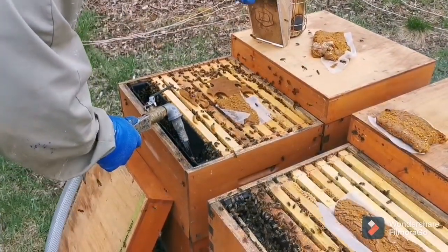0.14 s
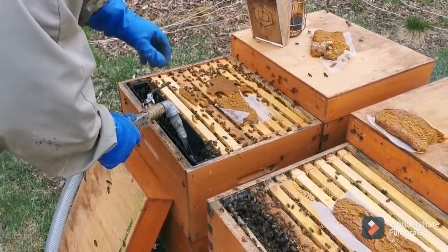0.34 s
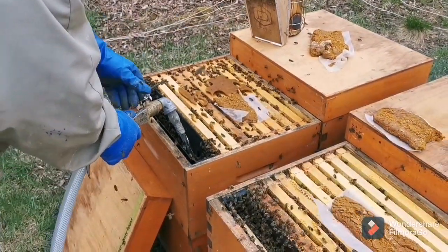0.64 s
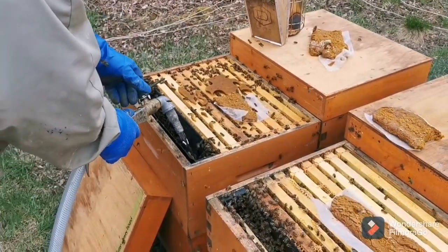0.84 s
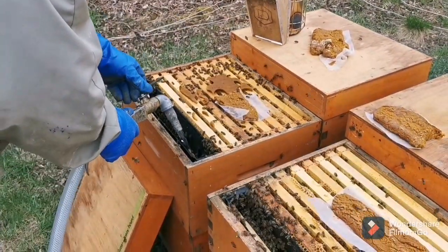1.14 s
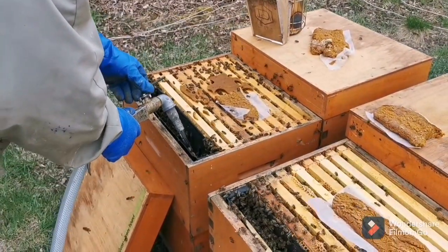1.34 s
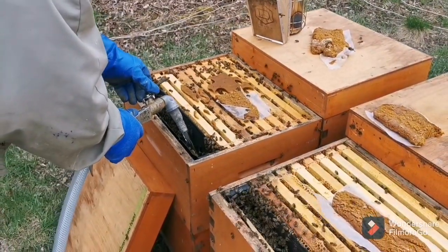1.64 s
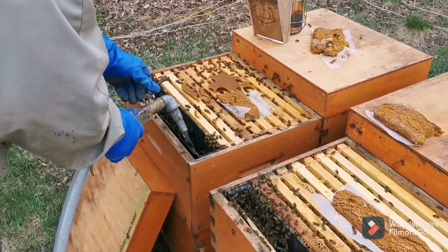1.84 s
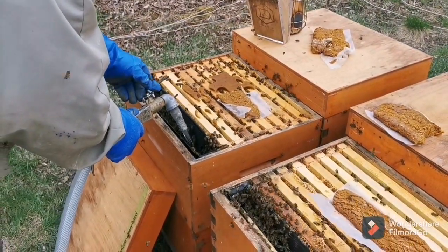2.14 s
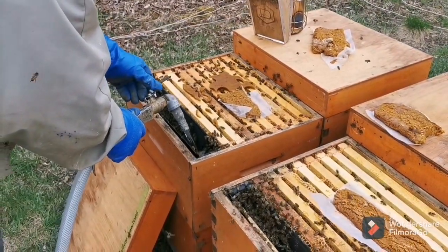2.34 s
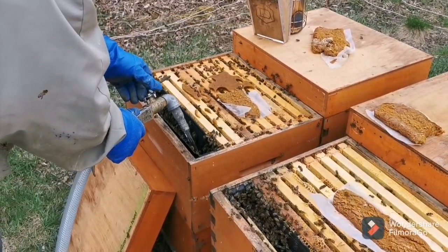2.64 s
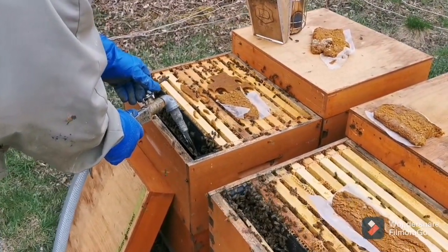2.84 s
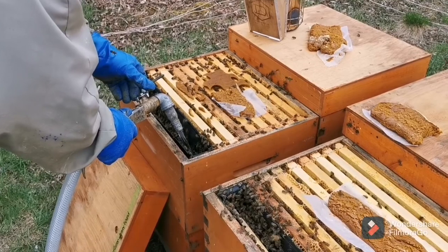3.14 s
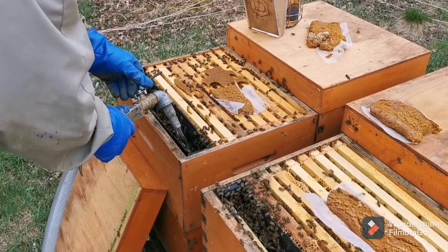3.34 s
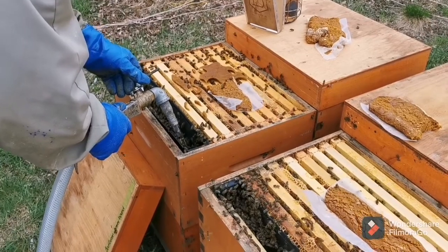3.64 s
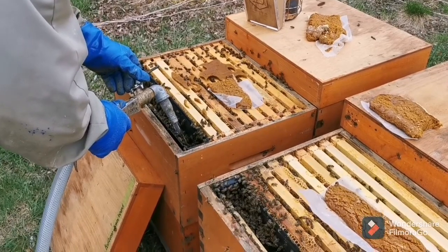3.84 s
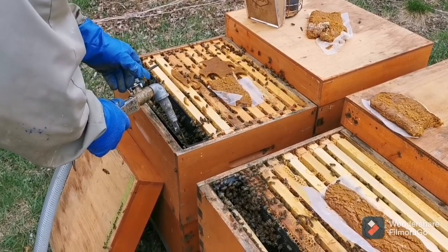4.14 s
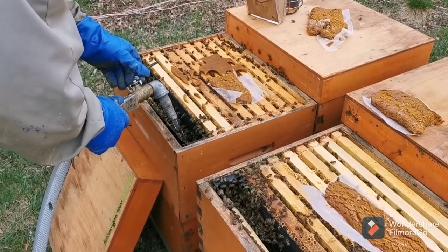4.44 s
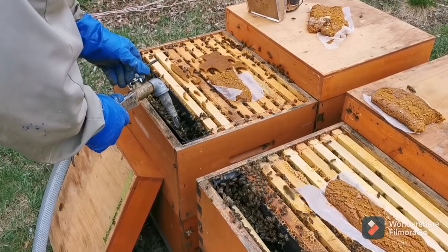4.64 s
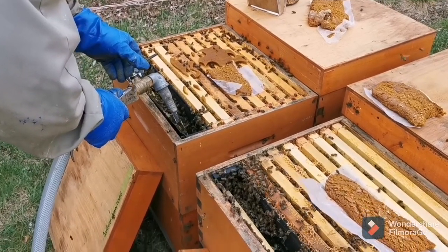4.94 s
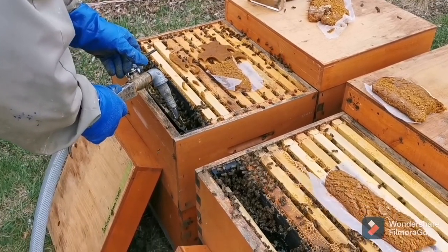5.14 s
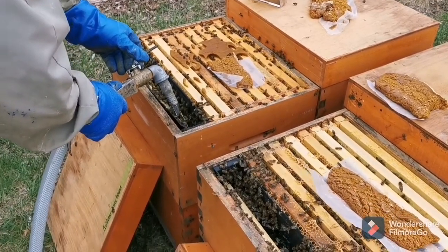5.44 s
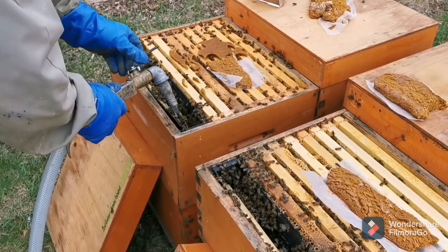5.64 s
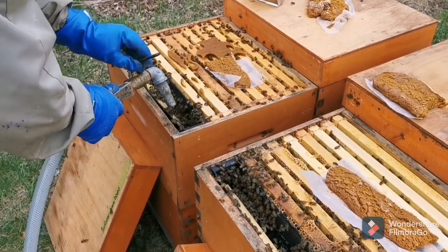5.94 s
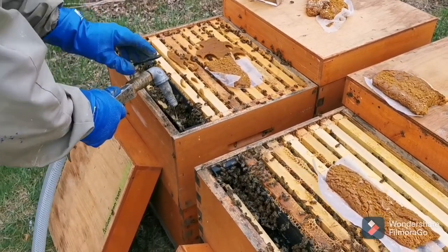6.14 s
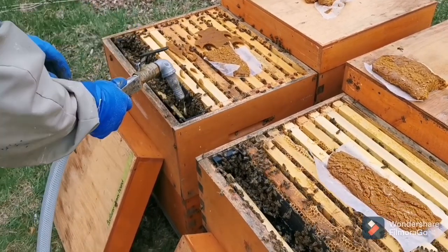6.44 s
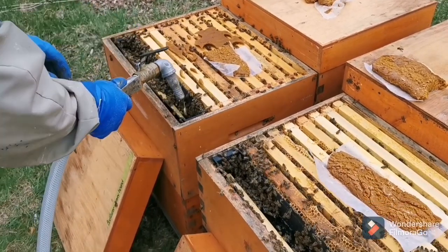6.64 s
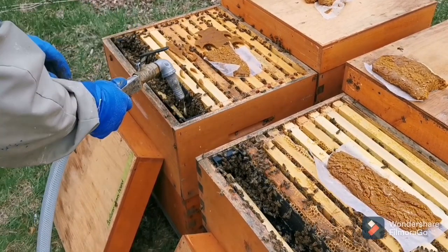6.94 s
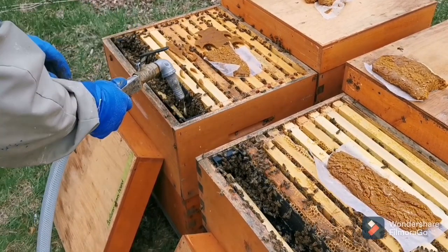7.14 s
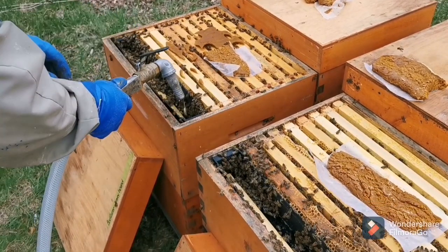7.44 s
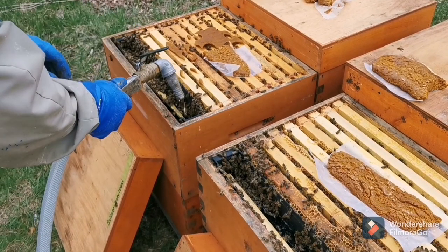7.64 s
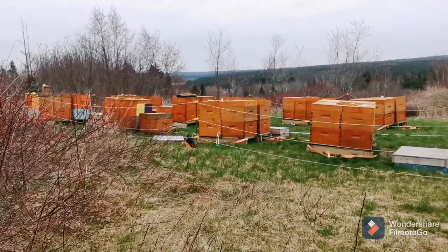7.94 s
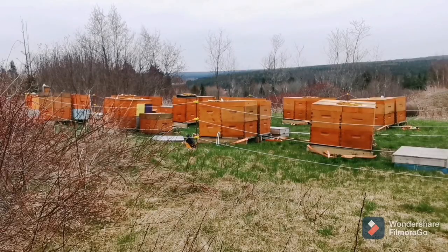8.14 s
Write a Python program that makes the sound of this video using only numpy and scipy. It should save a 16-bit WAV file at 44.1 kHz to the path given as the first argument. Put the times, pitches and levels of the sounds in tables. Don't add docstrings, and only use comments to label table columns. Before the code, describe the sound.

A small engine-driven pump chugs and clatters steadily outdoors among humming bees and wind buffets, then cuts to silence and a faint meadow bird whistle.

```python
import sys
import numpy as np
from scipy import signal
from scipy.fft import rfft, irfft, next_fast_len
from scipy.io import wavfile
from scipy.ndimage import uniform_filter1d

SR = 44100
rng = np.random.default_rng(int(sys.argv[2]) if len(sys.argv) > 2 else 0)


def transcribe(signal):
    frames = np.atleast_2d(signal).T
    limited = np.clip(frames, -1, 1)
    pcm = np.round(limited * 32767).astype(np.int16)
    wavfile.write(sys.argv[1], SR, pcm)


def to_linear_factor(level_db):
    exponent = np.asarray(level_db, float) / 20
    return 10 ** exponent


N = 365588
PAD = next_fast_len(N + SR // 4)
T = np.arange(N) / SR
HZ = np.arange(PAD // 2 + 1) * SR / PAD + 1e-3
CUT_S, RESUME_S = 7.7615, 8.056


def columns(rows, at, warp=lambda v: v):
    first, *rest = np.transpose(rows)
    return np.array([np.interp(warp(at), warp(first), column) for column in rest])


def shaped(x, response):
    return irfft(rfft(x, PAD) * response, PAD)[..., :N]


def per_hz(table):
    return to_linear_factor(columns(table, HZ, np.log)) * np.sqrt(SR / 2)


def rms_one(x):
    return x / np.sqrt(np.mean(x ** 2, axis=-1, keepdims=True))


def band(low_hz, high_hz, count):
    sos = signal.butter(2, [low_hz, high_hz], "band", fs=SR, output="sos")
    return rms_one(signal.sosfilt(sos, rng.standard_normal((count, N))))


def swells(s, length_s, db):
    coarse = T[::64]
    power = to_linear_factor(2 * db) @ np.exp(-((coarse - s[:, None]) / length_s[:, None]) ** 2)
    return np.interp(T, coarse, power)


def patchy(x, depth_db):
    edges = 1000 * 2 ** np.arange(0, 4.6, .5)
    spectrum = rfft(x, PAD)
    out = irfft(spectrum * (HZ < edges[0]), PAD)[..., :N]
    for low_hz, high_hz in zip(edges, edges[1:]):
        wander = np.interp(T * 60, np.arange(600), rng.standard_normal(600)) * 1.2
        gain = to_linear_factor(depth_db * wander - .06 * depth_db ** 2)
        inside = (HZ >= low_hz) & (HZ < high_hz)
        out = out + gain * irfft(spectrum * inside, PAD)[..., :N]
    return out


def at_ports(left, right):
    return np.array([np.roll(left, 22), right])


# (frequency [Hz], left level [dB per Hz], right level [dB per Hz])
MEADOW_AIR = [(60, -91, -105), (194, -100, -106), (600, -105, -105), (2500, -113, -111),
              (4500, -119.5, -118.5), (8000, -116, -114), (11000, -119, -113), (15000, -127, -117)]
# (time [s], hum level [dB], hiss level [dB])
GRASS_BREEZE = [
    (8.056, -76.5, -80.5),
    (8.075, -77, -82.5),
    (8.12, -77.5, -77.5),
    (8.17, -78, -84),
    (8.21, -80, -77),
    (8.25, -77, -73),
    (8.29, -80, -75.5),
]
# (time [s], pitch [Hz], level [dB])
WHISTLE = [
    (8.065, 1244, -74),
    (8.091, 1580, -73),
    (8.099, 1620, -78),
    (8.112, 1625, -87),
    (8.126, 1570, -76),
    (8.145, 1410, -75),
    (8.168, 1240, -83),
]
# (time [s], left peak level [dB], right peak level [dB], centre [Hz], time to fade by 60 dB [s])
DRY_TICKS = [(8.058, -56, -45.5, 7130, 0.0087), (8.06, -70, -60, 2100, 0.029),
             (8.088, -67, -54.5, 8000, 0.0074), (8.096, -72, -57.5, 12500, .005),
             (8.102, -70, -61, 2400, 0.075), (8.105, -67, -68, 8100, 0.14),
             (8.161, -61.5, -47, 11500, 0.006), (8.161, -73, -62, 3600, 0.005),
             (8.161, -66, -52, 14800, .005), (8.138, -74, -62, 10000, .005), (8.108, -72, -66, 4500, .03),
             (8.249, -79, -59.5, 13500, .008)]


def meadow():
    white = rng.standard_normal((2, N))
    bright = 1 / (1 + (5000 / HZ) ** 6)
    hum_db, hiss_db = columns(GRASS_BREEZE, T) + 78
    hum = shaped(white, per_hz(MEADOW_AIR) * (1 - bright)) * to_linear_factor(hum_db)
    hiss = shaped(white, per_hz(MEADOW_AIR) * bright) * to_linear_factor(hiss_db)
    air = patchy(hum + hiss, depth_db=2.7)

    pitch_hz, level_db = columns(WHISTLE, T)
    edge = np.clip(np.minimum(T - WHISTLE[0][0], WHISTLE[-1][0] - T) / 0.0052, 0, 1)
    tone = np.sin(2 * np.pi * np.cumsum(pitch_hz) / SR)
    out = air + edge * to_linear_factor(level_db + 2.0) * tone * to_linear_factor([[1.5], [-2.5]])

    for s, left_db, right_db, hz, t60 in DRY_TICKS:
        fade = (T > s) * to_linear_factor(-60 * np.clip(T - s, 0, 1) / t60)
        out += to_linear_factor([[left_db], [right_db]]) * 0.43 * fade * band(hz / 1.1, hz * 1.1, count=1)
    return out


def bees():
    wing_hz, width_hz = 246.6, 19
    swell_db = 2.5 * band(1.5, 7.4, count=2)
    hum = shaped(rng.standard_normal((2, N)), 1 / (1 + ((HZ - wing_hz) / width_hz * 2) ** 2))
    return to_linear_factor(-58 + swell_db) * rms_one(hum)


def sleeve():
    middle_s, length_s = .16, .035
    return to_linear_factor(-58) * np.exp(-.5 * ((T - middle_s) / length_s) ** 2) * band(4500, 7500, count=1)


# (time [s], length [s], rumble level [dB], flutter over rumble [dB])
LEFT_THUMPS = [(.24, 0.067, -47.5, -6), (0.406, 0.035, -26.5, -0.5), (.5, 0.032, -30, -12.5),
               (0.888, 0.036, -47, -1), (1.194, 0.039, -31.5, -8), (1.467, 0.056, -29, -10.5),
               (1.816, 0.025, -30, -15), (2.072, 0.04, -35, 6), (2.58, 0.03, -34.5, 1.5),
               (2.75, .12, -47, -1), (3.12, 0.045, -43, -2), (4.207, 0.035, -38, -22),
               (4.403, 0.038, -43, -14), (5.113, 0.014, -21, -9), (5.283, 0.045, -39.5, -10.5),
               (5.682, 0.042, -39.5, -3), (5.836, 0.029, -36.5, -4), (6.004, 0.068, -38.5, -12),
               (6.257, 0.052, -35.5, -12), (6.43, 0.055, -30, -6.5), (6.551, 0.051, -26, -2.5),
               (6.79, 0.047, -31, -6.5), (6.922, 0.069, -37.5, -1), (7.125, 0.032, -43, 1),
               (7.26, 0.086, -35, 0), (7.55, 0.17, -42, 0.5), (7.703, 0.044, -37.5, -7)]
# (time [s], length [s], flutter level [dB], rumble over flutter [dB])
RIGHT_BUFFETS = [(.68, 0.069, -51.5, 9), (1.3, 0.13, -49.5, -4), (1.584, 0.085, -33.5, -6),
                 (1.745, 0.086, -28, -3.5), (1.892, 0.052, -30, 1.5), (1.984, 0.04, -31.5, -12),
                 (2.098, 0.054, -32, -1), (2.448, 0.062, -33, -3), (2.592, 0.083, -39, 5.5),
                 (2.88, 0.14, -46.5, -2), (3.223, 0.044, -41.5, 0.5), (3.512, 0.064, -35, 3),
                 (3.746, 0.1, -35.5, -4), (4.2, 0.16, -49, 4), (4.6, 0.15, -50.5, 7.5),
                 (5.426, 0.04, -37, -7), (5.578, 0.046, -43, 5), (5.772, 0.063, -37.5, 4),
                 (5.942, 0.049, -33, -5), (6.168, 0.13, -50, 6), (6.47, 0.035, -38.5, -3),
                 (6.642, 0.068, -30, -3), (6.81, 0.036, -34, -1), (6.98, 0.076, -32.5, -5.5),
                 (7.198, 0.11, -38, 0.5), (7.387, 0.038, -31.5, -0.5), (7.6, 0.11, -37, -2.5)]


def wind():
    s, length_s, db, over_db = np.transpose(LEFT_THUMPS)
    left = swells(s, length_s, db), swells(s, length_s, db + over_db)
    s, length_s, db, over_db = np.transpose(RIGHT_BUFFETS)
    right = swells(s, length_s, db + over_db), swells(s, length_s, db)
    gusts = np.transpose([left, right], (1, 0, 2))

    calm_db = np.array([-52, -50.5])
    calm = to_linear_factor(2 * (calm_db + [[0], [-12.5]]))
    low, high = np.sqrt(gusts + calm[..., None])

    lumps = to_linear_factor(1.4 * band(6.2, 26, count=4))
    rumble = rms_one(band(24, 76.6, count=2) * lumps[:2])
    flutter = rms_one(band(75.6, 148.5, count=2) * lumps[2:])
    fringe = rms_one(band(166, 274, count=2) * lumps[2:]) * to_linear_factor([[-17.5], [-10.5]])
    return rumble * low + (flutter + fringe) * high


def ring(clicks, hz, t60):
    r, w = to_linear_factor(-60 / (t60 * SR)), 2 * np.pi * hz / SR
    return signal.lfilter([0, np.sin(w)], [1, -2 * r * np.cos(w), r * r], clicks + 1e-18)


# (time [s], peak level [dB], brightness [Hz])
NOZZLE_KNOCKS = [
    (1.1076, -24, 800),
    (1.1107, -22, 800),
    (1.1955, -27.5, 230),
    (1.1995, -33, 180),
    (1.2095, -30.5, 200),
    (1.2135, -33, 150),
    (1.225, -35, 200),
]
# (frequency [Hz], level [dB], time to fade by 60 dB [s])
BOX_MODES = [(275, -3.5, .04), (440, -8, .035), (665, 1, .03), (745, -1, .024), (1150, -17, .012),
             (1700, -11, .015), (2250, -15, .012)]


def nozzle():
    out = np.zeros(N)
    late = round(.0033 * SR)
    for s, peak_db, bright_hz in NOZZLE_KNOCKS:
        soft = np.exp(-2 * np.pi * bright_hz / SR)
        blow = (np.arange(N) == round(s * SR)) * to_linear_factor(peak_db)
        click = signal.lfilter([1 - soft], [1, -soft], blow)
        for hz, level_db, t60 in BOX_MODES:
            out -= to_linear_factor(level_db) * ring(np.roll(click, late * (hz < 300)), hz, t60)
    out = shaped(out, 1 - .8 / (1 + 2j * (HZ - 1000) / 500))
    return out * to_linear_factor([[.7], [-.7]])


# (time [s], crank turns per minute [1/min])
ENGINE_SPEED = [
    (0, 2111.96),
    (2.1, 2116.54),
    (2.8, 2108.2),
    (4, 2112.72),
    (5.6, 2112.98),
    (7.1, 2103.66),
    (8.3, 2103.32),
]


def engine_cycles():
    turn = .0082 + np.cumsum(columns(ENGINE_SPEED, T)[0]) / 120 / SR
    drift = np.interp(turn / 4, np.arange(50), rng.standard_normal(50))
    return turn + .005 * drift * np.minimum(turn, 1)


# (moment [share of cycle], click level [dB], rattle level [dB], gas jet level [dB], fade [ms])
CONTACTS_IN_CYCLE = [
    (.895, -6, -6, -14, 3.0),
    (.945, 1, 1.5, -16, 3.5),
    (.035, -7, -8, -12, 4.0),
    (.11, -7, -5, -1, 5.0),
    (.19, -5, -6, -6, 4.0),
    (.26, -8, -6, -3, 6.0),
    (.39, -6, -3, 1.5, 4.5),
    (.47, -7, -7, -12, 4.0),
    (.70, -6, -9, -14, 3.0),
]


def metal_clicks(turn, scatter_ms, spread_db):
    out = np.zeros(N)
    for k, (share, click_db, *_) in enumerate(CONTACTS_IN_CYCLE):
        at = np.flatnonzero(np.diff(np.floor(turn - share)))
        early, size = rng.standard_normal((2, 200))[:, :len(at)]
        at = np.clip(at + (early * scatter_ms * SR / 1000).astype(int), 0, N - 1)
        out[at] += to_linear_factor(click_db + spread_db * size) * (-1) ** k
    return rms_one(out)


def bursts(turn, column, steady_db, spread_db, rise_ms):
    power = to_linear_factor(2 * steady_db)
    for row in CONTACTS_IN_CYCLE:
        since = turn - row[0] + 1
        strength_db = row[column] + spread_db * rng.standard_normal(200)[since.astype(int)]
        ms = since % 1 * 1000 / 17.6
        power = power + to_linear_factor(2 * strength_db) * np.exp(-ms / row[4]) * np.minimum(ms / rise_ms, 1)
    return rms_one(np.sqrt(power))


# (frequency [Hz], left level [dB per Hz], right level [dB per Hz])
ENGINE_BODY = [(139, -64, -77), (275, -76, -78.5), (402, -83.5, -84.5), (530, -80.5, -78),
               (730, -84.5, -83.5), (920, -85.5, -84), (1070, -85, -84), (1950, -92, -87.5),
               (2590, -90, -88.5), (3490, -93.5, -95), (5150, -98, -97), (6340, -99, -99),
               (8500, -101, -93), (10300, -106, -96.5), (13630, -105.5, -102), (15700, -105.5, -101)]
# (frequency [Hz], width [Hz], left level over the body [dB], right level over the body [dB])
CASING_MODES = [(650, 51, 3, -2), (800, 13, 7.5, 8), (877, 30, 5, 8), (966, 31, 3, 4.5),
                (1188, 21, 2.5, 3.5), (1397, 9.4, 12.5, 9), (1523, 83, 11.5, 9.5), (2062, 13.4, 14, 11),
                (2128, 60, 9, 9.5), (2275, 115, 4.5, 8), (2380, 60, 1, 4.5), (2565, 22, -3.5, 6.5),
                (2836, 14, 2, 11), (3076, 73, -3, 9), (4050, 36, 2.5, 8), (4190, 82, 4, 6.5),
                (4850, 42, 8.5, -4.5), (5270, 170, 3, -2), (6690, 170, 9.5, 2.5), (7270, 310, 3.5, 6),
                (8410, 130, 12.5, 3), (9410, 190, -3, 5), (10820, 440, -3, 7.5), (12160, 810, 1, 5.5)]
# (frequency [Hz], likeness [0-1])
PORT_LIKENESS = [(150, 1), (1050, 0.73), (1800, 0.86), (2200, 0.78), (2700, 0.77), (3300, 0.6),
                 (3800, 0.43), (5000, 0.4), (10000, 0.01)]
# (time [s], length [s], level over the jets [dB])
HISS_SWISHES = [
    (.04, 0.033, -4),
    (0.14, 0.043, -1),
    (0.3, 0.093, -4.5),
    (0.47, .04, -2),
    (2.432, 0.024, -5),
    (7.753, 0.012, 1.5),
]


def clatter(turn):
    shared, left, right = rng.standard_normal((3, N))
    knock = bursts(turn, column=2, steady_db=-7.5, spread_db=1.2, rise_ms=.9)
    jet = bursts(turn, column=3, steady_db=-5, spread_db=1.5, rise_ms=6.0)
    jet = jet * to_linear_factor(0.5) * np.sqrt(1 + swells(*np.transpose(HISS_SWISHES)))
    high = 1 / (1 + (4600 / HZ) ** 6)
    low = 1 / (1 + (HZ / 1050) ** 6)

    struck = .3 / (1 + (1100 / HZ) ** 6) / (1 + (HZ / 3000) ** 4)
    geared = .3 / (1 + (1050 / HZ) ** 8) / (1 + (HZ / 2600) ** 6)
    mesh = np.interp(turn % 1 * 1250, np.arange(1251), rng.standard_normal(1251))
    teeth = rms_one(mesh * knock) * np.sqrt(.58)
    clicks = np.sqrt(struck) * rfft(metal_clicks(turn, scatter_ms=.05, spread_db=1.2), PAD)

    def drive(x):
        return rfft(x, PAD) * low + rfft(x * knock, PAD) * (1 - high - low) + rfft(x * jet, PAD) * high

    alike = np.clip(columns(PORT_LIKENESS, HZ, np.log)[0], 0, 1)
    common = np.sqrt(1 - struck - geared) * drive(shared) + clicks + np.sqrt(geared) * rfft(teeth, PAD)
    ports = []
    for side, own in enumerate((left, right)):
        modes = 1 + sum((to_linear_factor(m[2 + side]) - 1) / (1 + 2j * (HZ - m[0]) / m[1]) for m in CASING_MODES)
        colour = per_hz(ENGINE_BODY)[side] * modes / (1 + (130 / HZ) ** 4) * to_linear_factor(0.5)
        heard = np.sqrt(alike) * common + np.sqrt(1 - alike) * drive(own)
        ports.append(irfft(heard * colour, PAD)[:N])
    return patchy(at_ports(*ports), depth_db=.9)


# (multiple of the firing rate [1], level [dB rms])
EXHAUST_NOTE = [(1, -72.2), (2, -55.8), (3, -57.3), (4, -45.5), (5, -50.9), (6, -45.7), (7, -54.5),
                (8, -50.0), (9, -43.7), (10, -47.3), (11, -49.8), (12, -61.6), (13, -57.3), (14, -56.0),
                (15, -60.0), (16, -64.4), (17, -58.0), (18, -57.5), (19, -55.2), (20, -69.2), (21, -55.0),
                (22, -69.8), (23, -66.2), (24, -64.5), (25, -59.0), (26, -59.0), (27, -70.0), (28, -63.5),
                (29, -85.2), (30, -66.5), (31, -72.0), (32, -63.0), (33, -70), (34, -68), (35, -69),
                (36, -64), (37, -68), (38, -67), (39, -76), (40, -71), (41, -68), (42, -68), (43, -79),
                (44, -76), (45, -63), (46, -66), (47, -76), (48, -69), (49, -63), (50, -73), (51, -66),
                (52, -83), (53, -65), (54, -71), (55, -76), (56, -70)]
PIPE_TRAVEL = [(1, -.08), (5, -.28), (6, .33), (8, -.05), (9, .24), (12, .52), (14, .33), (17, 0), (18, .1),
               (21, .17), (22, .6), (25, .08), (26, -.12), (28, .12), (32, -.02), (34, -.15), (38, .1),
               (44, -.36), (50, -.25), (56, -.05)]
# (multiple [1], left level over the mean [dB], left lead [turns])
PIPE_AT_PORTS = [(1, 2.2, 0), (10, 1.4, 0), (21, 1.8, .05), (25, -.5, .04), (34, 1.5, .05), (38, 0, -.07),
                 (45, -2, -.06), (56, -1, -.01)]


def exhaust(turn):
    order, level_db = np.transpose(EXHAUST_NOTE)
    phase = -2 * np.pi * (np.cumsum(columns(PIPE_TRAVEL, order)[0]) + .083)
    pan_db, lead = columns(PIPE_AT_PORTS, order)
    share = np.linspace(0, 1, 1025)
    late, strong = (np.interp(turn, np.arange(200), draw) for draw in rng.standard_normal((2, 200)))
    ports = []
    for side in (1, -1):
        waves = np.cos(2 * np.pi * np.outer(order, share) + (phase + side * np.pi * lead)[:, None])
        cycle = np.sqrt(2) * to_linear_factor(level_db + side * pan_db) @ waves
        ports.append(np.interp((turn + .0004 * late) % 1, share, cycle) * to_linear_factor(.5 * strong))
    return at_ports(*ports)


def scene():
    turn = engine_cycles()
    yard = exhaust(turn) + clatter(turn) + wind() + nozzle() + sleeve() + bees()
    return yard * np.clip((CUT_S - T) / 0.0014, 0, 1) + meadow() * (T > RESUME_S)


# (low edge [Hz], high edge [Hz], share of the time [0-1])
DROPPED_BANDS = [(690, 770, .05), (940, 1030, .25), (1030, 1120, .15), (1200, 1290, .08), (3200, 3450, .4),
                 (3450, 3700, .1), (5150, 5500, .1), (5850, 6200, .1), (6550, 6900, .07), (7050, 7350, .07),
                 (7650, 7900, .06), (8600, 8950, .05), (10000, 10330, .05), (11400, 11720, .05),
                 (13600, 14100, .08)]


def dropouts(mid):
    frame = np.arange(N) // 2048
    out, spectrum = mid.copy(), rfft(mid, PAD)
    for low_hz, high_hz, share in DROPPED_BANDS:
        gone = (rng.random(frame[-1] + 1) < share)[frame] * (T > 1.25) * (T < CUT_S)
        inside = (HZ > low_hz) & (HZ < high_hz)
        out -= uniform_filter1d(gone * 1., size=600) * irfft(spectrum * inside, PAD)[:N]
    return out


# (low edge [Hz], high edge [Hz], side level [dB])
MERGED_BANDS = [(5640, 7500, -7), (6900, 9300, -13), (8300, 10100, -8.5), (11700, 16000, -2.5),
                (13600, 15000, -6), (15000, 15000, -7)]


def top_cut(x):
    return signal.sosfilt(signal.butter(12, 15880, fs=SR, output="sos"), x)


def record(dry):
    below_top = HZ < 15780
    keep = np.ones(len(HZ))
    for low_hz, high_hz, side_db in MERGED_BANDS:
        keep[(HZ > low_hz) & (HZ < high_hz)] = to_linear_factor(side_db)
    mid = shaped(dry.mean(axis=0), below_top)
    side = shaped((dry[0] - dry[1]) / 2, keep * below_top)
    running = (T < CUT_S + .002) | (T > RESUME_S - .001)
    mid, side = dropouts(mid) * running, side * running
    since = np.clip(T - RESUME_S, 0, None)
    jump = -to_linear_factor(-42) * (1 - np.exp(-since / .0006)) * np.exp(-since / .04)
    return top_cut(np.array([mid + side + jump, mid - side]))


dry = scene()
out = record(dry)
transcribe(out)
```